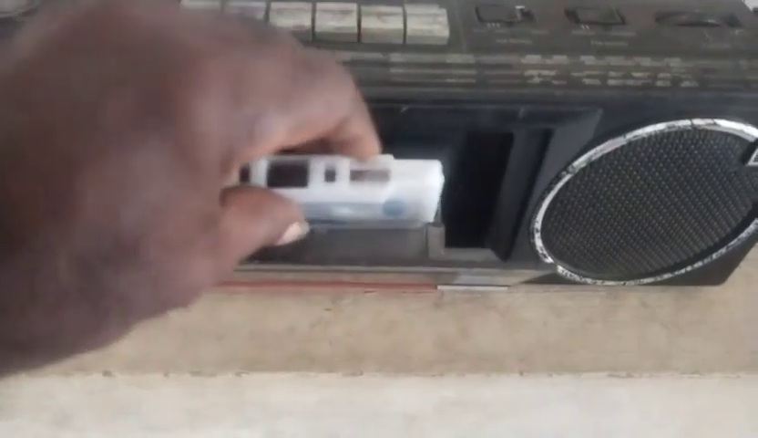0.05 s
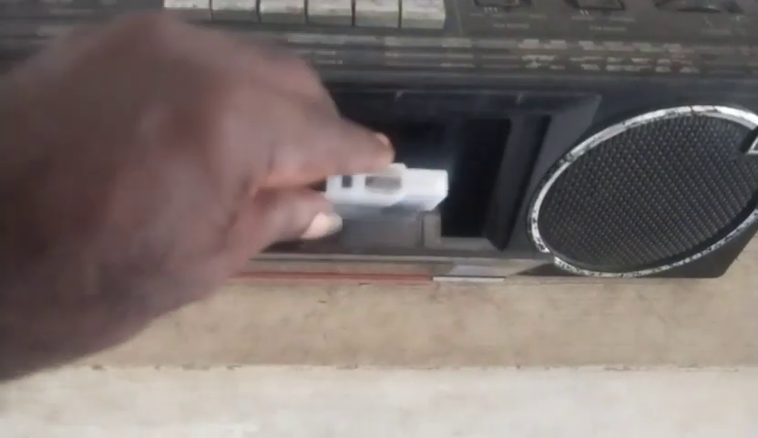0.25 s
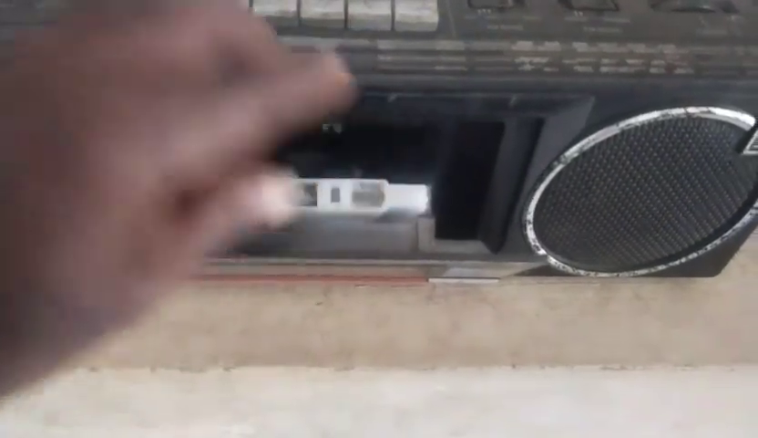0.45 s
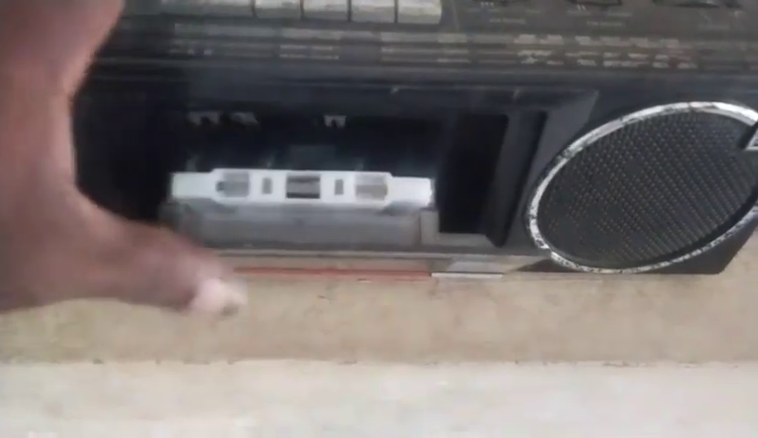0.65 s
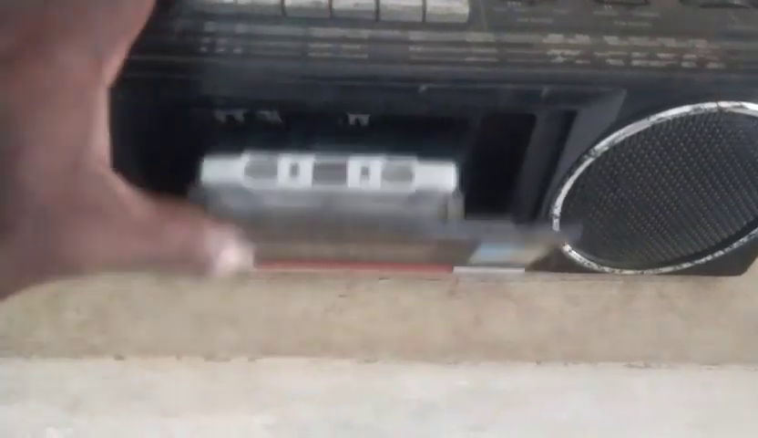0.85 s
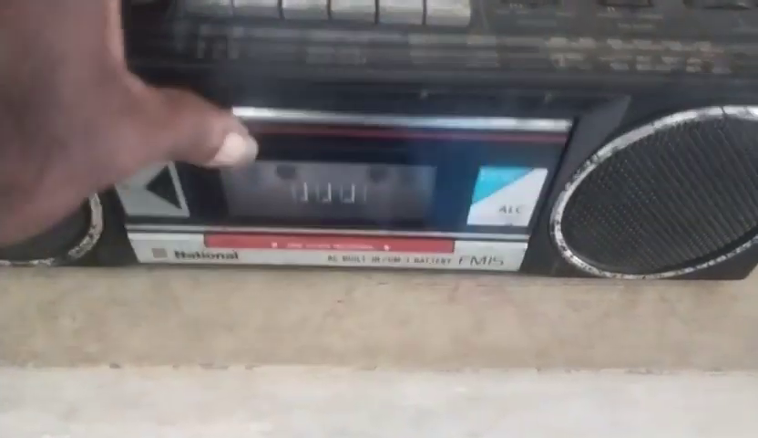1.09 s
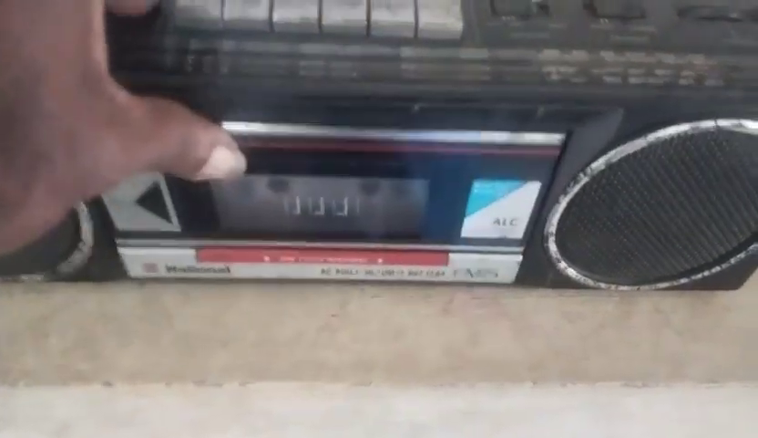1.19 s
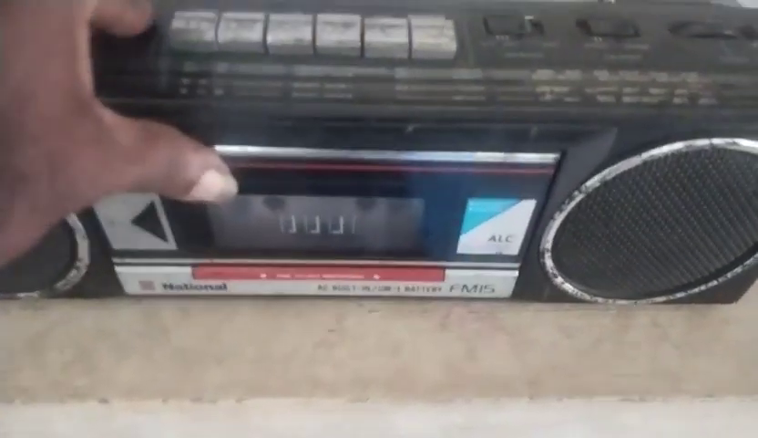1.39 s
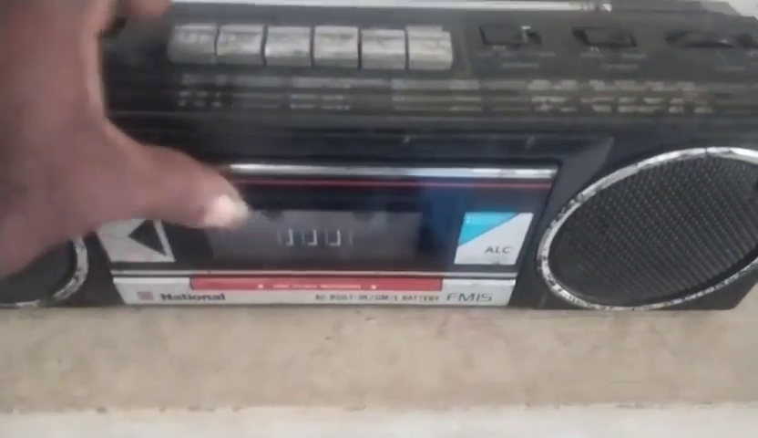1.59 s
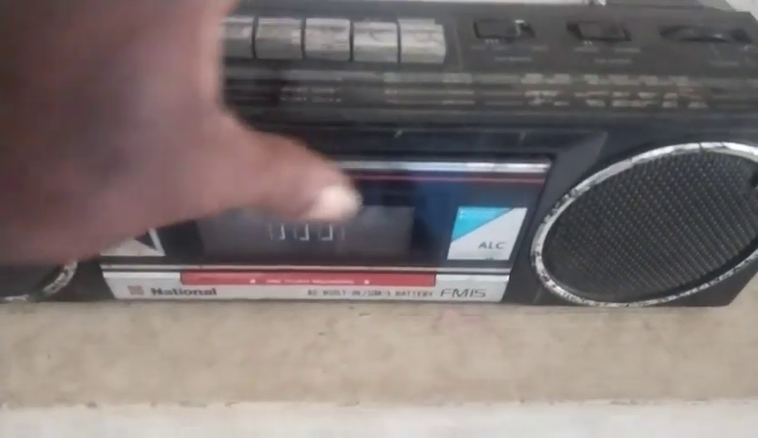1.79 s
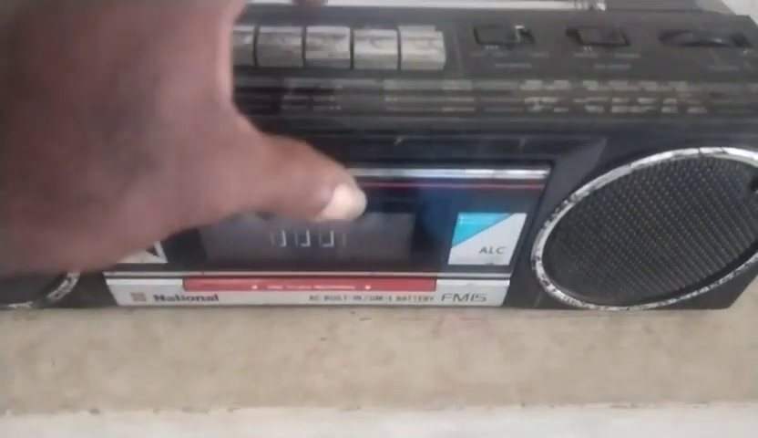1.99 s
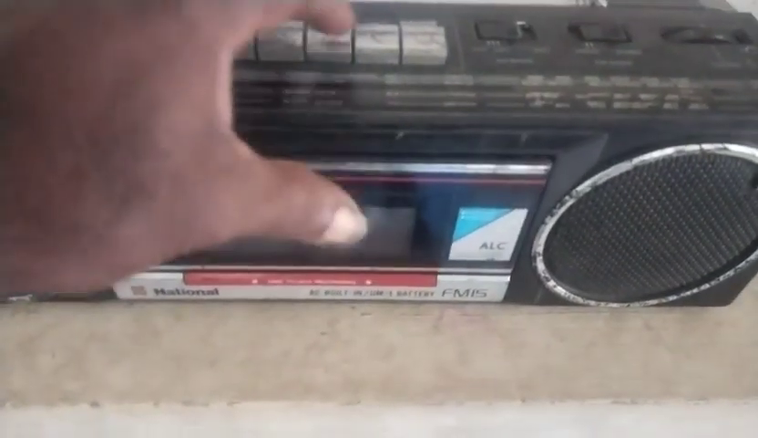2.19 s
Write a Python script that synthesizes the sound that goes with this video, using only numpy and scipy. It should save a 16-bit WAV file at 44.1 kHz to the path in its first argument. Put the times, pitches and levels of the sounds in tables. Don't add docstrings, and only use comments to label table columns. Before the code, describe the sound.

Close up, a tape scrapes briefly and clacks into its holder, the plastic door snaps closed in a burst of knocks, a thumb lightly creaks the panel, and far birds chirp and hoot over quiet rumble.

```python
import sys
import numpy as np
from scipy import signal
from scipy.fft import rfft, irfft
from scipy.io import wavfile
from scipy.ndimage import uniform_filter1d

SR = 44100
rng = np.random.default_rng(int(sys.argv[2]) if len(sys.argv) > 2 else 0)


def master(y):
    cut = np.clip(np.atleast_2d(y).T, -1, 1)
    pcm = np.round(cut * 32767)
    wavfile.write(sys.argv[1], SR, pcm.astype(np.int16))


def linear_from_db(decibels):
    return 10 ** (np.asarray(decibels, float) / 20)


N = 99225


def rms_one(x):
    return x / np.sqrt(np.mean(x ** 2) + 1e-20)


def in_time(rows):
    return np.interp(np.arange(N) / SR, *np.transpose(rows))


def at_hz(points, hz):
    f, value = np.transpose(points)
    return np.interp(np.log(hz + 1e-9), np.log(f), value)


def coloured(x, tone):
    hz = np.arange(N + 1) * SR / (2 * N)
    return irfft(rfft(x, 2 * N) * linear_from_db(at_hz(tone, hz)))[:N]


def high_pass(x, hz, order=2):
    return signal.sosfilt(signal.butter(order, hz, "high", fs=SR, output="sos"), x)


def drift(rate_hz):
    r = np.exp(-80 * np.pi * rate_hz / SR)
    noise = rng.standard_normal(N // 40 + 2002)
    slow = signal.lfilter([1], [1, -2 * r, r * r], noise)[2000:]
    return np.interp(np.arange(N) / 40, np.arange(len(slow)), rms_one(slow))


def ring(clicks, hz, width_hz):
    r, w = np.exp(-np.pi * width_hz / SR), 2 * np.pi * hz / SR
    return signal.lfilter([0, np.sin(w)], [1, -2 * r * np.cos(w), r * r], clicks + 1e-18)


# f/Hz, likeness [0-1]
LIKENESS = [(60, 0.86), (250, 0.88), (600, .6), (1200, 0.28), (4000, 0.11)]
# f/Hz, level/dB
DIFFUSE_BALANCE = [(60, 1), (240, -2.5), (950, 3), (3770, 6), (15000, -10)]


def bands(gain, alike_share=1):
    out, edges = 0, 30 * 2 ** np.arange(0, 9.6, .5)
    white = rng.standard_normal((2, 2, N))
    for k, (low, high) in enumerate(zip(edges, edges[1:])):
        band_pass = signal.butter(2, [low, high], "band", fs=SR, output="sos")
        mid, side = signal.sosfilt(band_pass, white[k % 2])
        hz = np.sqrt(low * high)
        alike = np.clip(alike_share * at_hz(LIKENESS, hz), 0, 1)
        pan = linear_from_db(at_hz(DIFFUSE_BALANCE, hz) / 2 * np.array([[1], [-1]]))
        stereo = np.sqrt(1 + alike) * mid + np.sqrt(1 - alike) * side * [[1], [-1]]
        out = out + gain(hz) * pan * stereo
    return out


# t/s, level/dB
RUMBLE_SWELL = [(0, -49), (.1, -59), (.3, -59.5), (.75, -62.5), (.9, -55), (1.1, -46), (1.3, -49),
                (1.55, -52.5), (1.7, -61.5), (1.85, -65.5), (2.0, -62), (2.12, -56.5), (2.2, -69.5),
                (2.25, -57.5)]
# f/Hz, level/dB per Hz
RUMBLE_TONE = [(18, -60), (30, -31.5), (92, 4), (189, -9), (216, -20.5), (300, -16), (390, -39),
               (660, -120)]


def traffic():
    rumble = bands(lambda hz: linear_from_db(at_hz(RUMBLE_TONE, hz) + 2.0 * drift(2.2)) * (hz < 300))
    return linear_from_db(in_time(RUMBLE_SWELL)) * rms_one(rumble)


# f/Hz, level/dB
AIR_TONE = [(200, -9.5), (350, 0), (700, -3.5), (1500, -7), (3000, -13.5), (5500, -23.5), (9000, -22),
            (15000, -28.5)]
AIR_DB, HOLLOW_DB = -68, -72.5


def room_air():
    air = bands(lambda hz: linear_from_db(at_hz(AIR_TONE, hz) + 1.5 * drift(5.5)) * (hz > 200), alike_share=0.27)
    hollow = ring(rng.standard_normal(N), hz=517, width_hz=25)
    return linear_from_db(AIR_DB) * rms_one(air) + linear_from_db(HOLLOW_DB) * rms_one(hollow)


def thin_hiss():
    hiss = np.array([ring(v, hz=8100, width_hz=630) for v in rng.standard_normal((2, N))])
    return linear_from_db(-86.5) * rms_one(hiss)


def whistles(notes, warble, grain):
    out, t = np.zeros(N), np.arange(N) / SR
    shake = 1 + warble * drift(300)
    for s, length, from_hz, to_hz, db in notes:
        u = np.clip((t - s) / length, 0, 1)
        hz = (from_hz + (to_hz - from_hz) * u) * shake
        swell = np.sin(np.pi * u) * (1 + grain * drift(150))
        out += linear_from_db(db) * swell * np.sin(2 * np.pi * np.cumsum(hz) / SR)
    return out


# t/s, length [s], start f/Hz, end f/Hz, level/dB
HOOTS = [
    (1.48, 0.084, 1530, 1490, -67),
    (1.595, 0.071, 1225, 1204, -61),
    (1.76, 0.083, 1158, 1182, -68),
    (1.91, 0.068, 1196, 1242, -68),
    (2.068, 0.021, 1235, 1214, -63),
    (2.09, 0.12, 1250, 1224, -69),
]


def hooting_bird():
    return whistles(HOOTS, warble=0.0059, grain=.25)


# t/s, length [s], start f/Hz, end f/Hz, level/dB
CHIRPS = [
    (1.46, 0.17, 5610, 5360, -65),
    (1.43, 0.17, 4250, 3990, -50),
    (1.49, 0.17, 4080, 3724, -52),
    (1.51, .12, 4620, 4440, -62.5),
    (1.54, .18, 3310, 2963, -56.5),
    (1.57, .14, 3760, 3440, -59),
    (1.7, .12, 2780, 2410, -64.5),
    (2.18, 0.12, 5300, 5430, -75.5),
    (2.2, 0.12, 4770, 4140, -66),
]


def chirping_bird():
    return np.array([whistles(CHIRPS, warble=.025, grain=.7) for ear in range(2)])


# f/Hz, time to fall 60 dB [s]
ROOM_T60 = [(200, 2.4), (600, 2.2), (1400, 1.11), (2500, 1.62), (5000, 1.3), (9000, .95), (14000, 0.33)]
# f/Hz, level/dB
ROOM_TONE = [(150, 0.081), (500, .1), (1300, 0.19), (2500, 0.11), (5000, .1), (9000, 0.16), (14000, .1)]
FIRST_ECHO_S, BUILD_S = 0.0022, 0.019
SAG_DB_PER_S2 = 55.5


def room(x):
    t = np.arange(N) / SR

    def decay(hz):
        return linear_from_db(at_hz(ROOM_TONE, hz) - 60 * t / at_hz(ROOM_T60, hz) - SAG_DB_PER_S2 * t ** 2)

    echo = bands(decay) * (1 - np.exp(-np.maximum(t - FIRST_ECHO_S, 0) / BUILD_S))
    return signal.fftconvolve(x[None], rms_one(echo) / np.sqrt(N), axes=1)[:, :N]


def ports(x, balance, lag_s):
    hz = np.arange(N + 1) * SR / (2 * N)
    half = linear_from_db(at_hz(balance, hz) / 2) * np.exp(-1j * np.pi * hz * lag_s)
    return irfft(rfft(x, 2 * N) * np.array([half, 1 / half]))[:, :N]


def body(at, db, tilt_db, boom_db, modes, sharp):
    out, sign = np.zeros(N), rng.choice([-1, 1], len(at))
    scatter_db = 3.5 * rng.standard_normal((len(at), len(modes)))
    for k, (hz, mode_db) in enumerate(modes):
        size_db = db + mode_db + tilt_db * np.log2(hz / 2000) + boom_db * (hz < 1150) + scatter_db[:, k]
        clicks = np.bincount(at, sign * (-1) ** k * linear_from_db(size_db), N)[:N]
        width_hz = .13 * hz * (1 / sharp + 1.6 * (hz > 5000))
        out += np.sqrt(hz / 2000) * ring(clicks, hz, width_hz)
    crack = np.bincount(at, sign * linear_from_db(db - 25 + tilt_db * 2), N)[:N]
    out += high_pass(crack, 6000, order=1)
    return high_pass(out, 170, order=4)


def knocks(hits, modes, sharp, count=24):
    s, db, length, tilt_db, boom_db = np.transpose(hits)[:, :, None]
    share = rng.random((len(hits), count)) * (np.arange(count) > 0)
    at = ((s + 1.5 * np.clip(length, .001, .05) * share) * SR).astype(int)
    level = db - 9 - 11.5 * share + 3 * (share == 0)
    tilt_db, boom_db = tilt_db + 0 * share, boom_db + 0 * share
    return body(at.ravel(), level.ravel(), tilt_db.ravel(), boom_db.ravel(), modes, sharp)


# f/Hz, level/dB
DOOR_BALANCE = [(250, -0.5), (500, -0.5), (1000, 9), (2500, 13), (5000, 15.5), (9000, -7.5), (14000, -3)]


def door_ports(x):
    return ports(x, DOOR_BALANCE, lag_s=0.000403)


# t/s, peak level/dB, rattle length [s], brightness [dB per octave], low-mode boom [dB]
THUMB_HITS = [
    (1.355, -59, 0.0097, 0, 14),
    (1.408, -35.5, 0.015, -1.5, -3),
    (1.43, -44, 0.031, -2.5, 1.5),
    (1.45, -44, .02, 1, 6),
    (1.469, -43, 0.0035, -3.5, 3),
    (1.483, -39, 0.0062, -1.6, -4),
    (1.495, -49, .03, -1, 10.5),
    (1.525, -52.5, .04, -2, 9.5),
]
# f/Hz, level/dB
THUMB_BODY = [(370, -7), (500, -0.5), (680, -3.5), (1030, -14.5), (1300, -15), (2250, -13.5), (2750, -11),
              (3400, -14.5), (5500, -9.5), (8500, -7.5)]


def thumb():
    dry = knocks(THUMB_HITS, THUMB_BODY, sharp=1.82)
    return door_ports(dry), linear_from_db(-13) * dry


# t/s, peak level/dB, rattle length [s], brightness [dB per octave], low-mode boom [dB]
DOOR_HITS = [(.849, -36, 0.013, 2, 5.5), (.865, -34.5, .011, 4.5, 1), (.8868, -21.5, 0.0055, 8, -23),
             (.8915, -21.5, 0.0049, -3.5, -11.5), (.8965, -21, 0.0052, -2, -2),
             (.9015, -12.5, .01, 0, -4.5), (.9115, -17, 0.008, -1, -5), (.9185, -15, .006, 0, -1.5),
             (.9247, -10, 0.0035, -0.5, -0.5), (.9268, -8, .005, 2, -1.5), (.9315, -13.5, 0.0051, 0, -6),
             (.935, -14, 0.0067, -0.5, -5), (.943, -22, .012, -4.5, -1.5)]
# f/Hz, level/dB
DOOR_BODY = [(270, -15), (430, -9), (560, -2.5), (780, -0.5), (1070, -4), (1450, -7.5), (1850, -4),
             (2500, -2.5), (3100, -5.5), (3850, -5), (5200, -3), (6900, -5.5), (9000, -19.5), (12800, -31)]
# f/Hz, level/dB
DOOR_SEND = [(180, 7.5), (350, 0), (600, 1.5), (1200, -2.5), (2000, 1), (3400, -0.5), (6000, 1),
             (10000, -1)]


def door():
    dry = knocks(DOOR_HITS, DOOR_BODY, sharp=0.72)
    return door_ports(dry), coloured(dry, DOOR_SEND)


# t/s, level/dB, low-mode boom [dB]
SLIDE = [
    (0, -42, -0.5),
    (.035, -39, -3.5),
    (0.051, -35.5, 5.5),
    (.075, -37, 0),
    (.095, -48.5, 10.5),
    (.125, -49, 8.5),
    (.145, -53.5, 8.5),
    (.165, -43, 11),
    (.2, -49, 3.5),
    (0.229, -47, 10.5),
]
# f/Hz, level/dB
GUIDE_BODY = [(210, -12), (380, -12.5), (540, -5), (720, -2.5), (1150, -9.5), (1850, -1.3), (2480, -2.5),
              (3000, -7.5), (3700, -8.5), (4600, -13.5), (5600, -10), (6900, -6.5), (8400, -14.5),
              (10500, -25)]
CATCHES_PER_S = 4000


def slide():
    at = np.flatnonzero(rng.random(int(.23 * SR)) < CATCHES_PER_S / SR)
    s, db, boom_db = np.transpose(SLIDE)
    size_db = 2.0 * rng.exponential(1, N)[at] + 1.5 * drift(60)[at]
    level = np.interp(at / SR, s, db) - 14.5 + size_db
    return body(at, level, 2.5, np.interp(at / SR, s, boom_db), GUIDE_BODY, sharp=2.7)


# t/s, peak level/dB, rattle length [s], brightness [dB per octave], low-mode boom [dB]
TAPE_HITS = [(.0443, -31.5, 0.0049, -2, -11.5), (.0483, -30.5, .01, -5, -14),
             (.0672, -27.5, 0.0095, -2.5, -11.5), (.082, -32, .006, 2, 8), (.106, -37.5, 0.0042, -0.5, 10),
             (.1206, -42, 0.012, -1.5, -7.5), (.1531, -33, 0.0071, 3.5, -4), (.159, -36, .012, 1, 16),
             (.173, -39.5, .006, 1, 10), (.185, -37, .014, 7, 1.5), (.2335, -16, 0.00083, 4, -10),
             (0.236, -17, 0.011, 3, -9.5), (0.254, -22, 0.0076, 1.5, -4.5), (.2585, -26, 0.0048, -2, -1),
             (.2657, -11.5, .005, 1, 3), (.2697, -5, .005, 3, -3.5), (.2735, -9.5, .005, 1.5, -1.5),
             (.2775, -6, 0.0075, 1, -1.5), (.284, -20, .006, -1.5, -2), (.311, -18, .006, 0, 1.5),
             (.3155, -18.5, .008, -2.5, -5.5), (.388, -26, 0.004, 1.5, 2), (.697, -35, .03, 2, 5.5)]
# f/Hz, level/dB
TAPE_BODY = [(215, -23), (370, -11), (505, 2.5), (750, -4), (1000, -8), (1310, -7), (1620, -8), (1950, -3),
             (2600, -4), (3150, -7), (3900, -7.5), (5200, -9), (7000, -13), (10500, -21)]
# f/Hz, level/dB
TAPE_BALANCE = [(250, -0.5), (500, -0.5), (1000, 8), (2500, 10.5), (5000, 11), (9000, -7.5), (14000, -0.5)]
# f/Hz, level/dB
TAPE_SEND = [(270, 2.5), (400, -6), (600, 1.5), (1200, 2.5), (2000, 0), (3600, -5), (6000, 2), (10000, 1)]


def cassette():
    on_guides = [hit for hit in TAPE_HITS if hit[0] < .2]
    seated = TAPE_HITS[len(on_guides):]
    dry = knocks(seated, TAPE_BODY, sharp=1.57) + knocks(on_guides, GUIDE_BODY, sharp=2.3) + slide()
    return ports(dry, TAPE_BALANCE, lag_s=.0002), coloured(dry, TAPE_SEND)


def scene():
    background = traffic() + room_air() + thin_hiss()
    hoots, chirps = hooting_bird(), chirping_bird()
    far = linear_from_db(-1) * chirps + linear_from_db(4) * hoots
    (thumb_near, thumb_sent), (door_near, door_sent), (tape_near, tape_sent) = thumb(), door(), cassette()
    near = thumb_near + door_near + tape_near
    sent = linear_from_db(-5.5) * (thumb_sent + door_sent + tape_sent) + linear_from_db(-19) * (chirps[0] + hoots)
    return near + far + room(sent) + background


def roll_off(x):
    return signal.sosfilt(signal.butter(12, 16510, fs=SR, output="sos"), x)


KNEE_DB, SQUEEZE, RECOVER_DB_PER_S = -21, 0.23, 16.5
MIC_LOW_HZ, TOP_CUT_HZ, CLIP_LEVEL = 95, 16000, .75


def record(dry):
    def smooth(x):
        return uniform_filter1d(x, size=441, origin=220)

    ramp = RECOVER_DB_PER_S * np.arange(N) / SR
    level = 10 * np.log10(smooth(np.mean(dry ** 2, axis=0)) + 1e-12)
    held = np.maximum.accumulate(level + ramp) - ramp
    over = np.maximum(held - KNEE_DB, 0)
    x = high_pass(dry, MIC_LOW_HZ) * linear_from_db(-SQUEEZE * smooth(over))
    x = high_pass(CLIP_LEVEL * np.tanh(x / CLIP_LEVEL), MIC_LOW_HZ / 2)
    mix = signal.sosfilt(signal.cheby2(12, 70, TOP_CUT_HZ, fs=SR, output="sos"), x)
    return roll_off(mix)


dry = scene()
out = record(dry)
master(out)
```